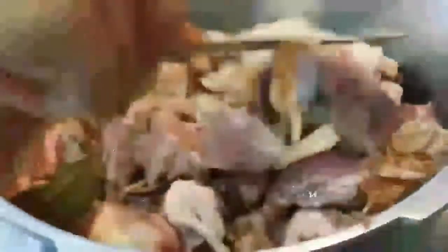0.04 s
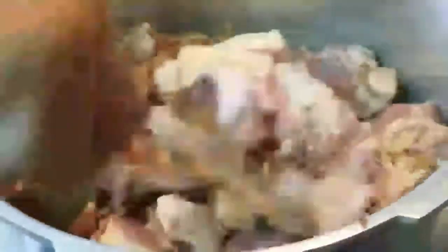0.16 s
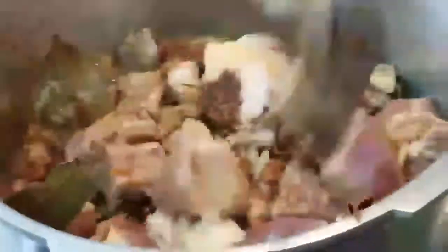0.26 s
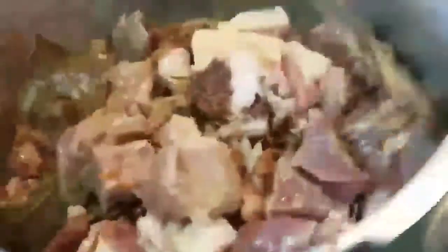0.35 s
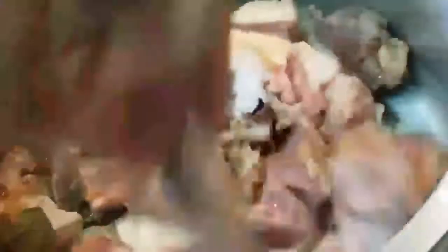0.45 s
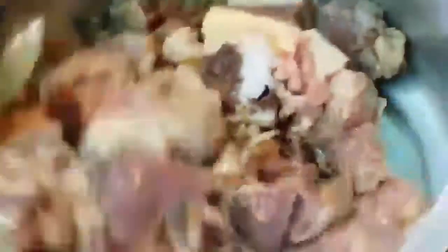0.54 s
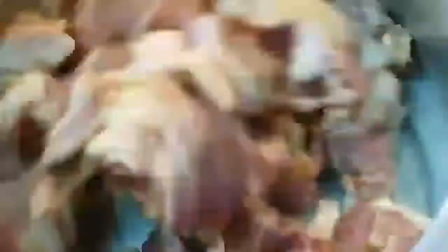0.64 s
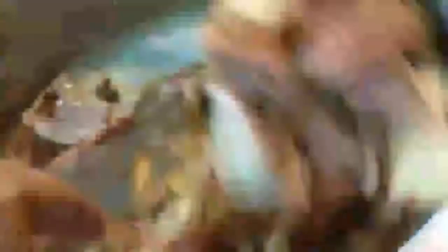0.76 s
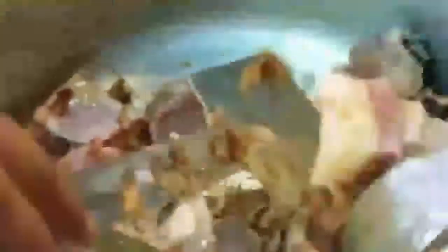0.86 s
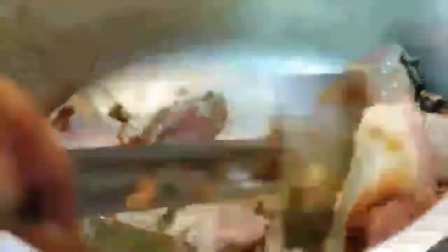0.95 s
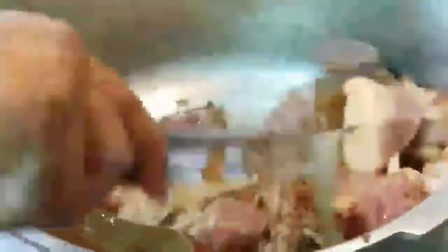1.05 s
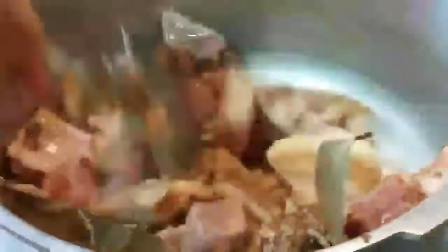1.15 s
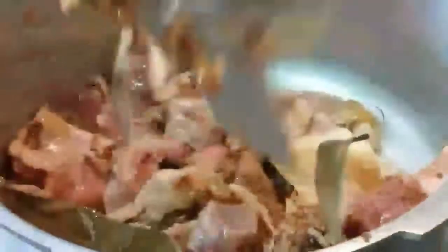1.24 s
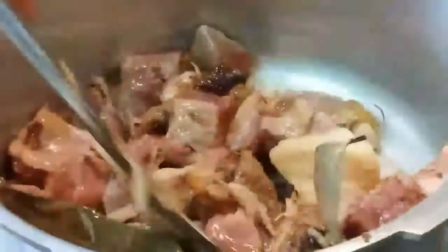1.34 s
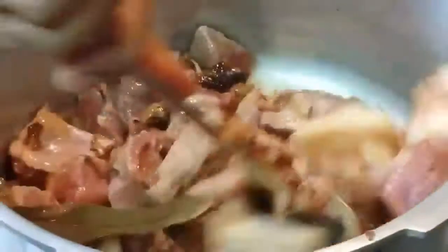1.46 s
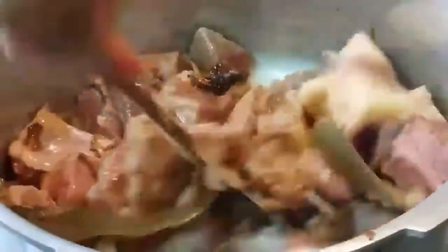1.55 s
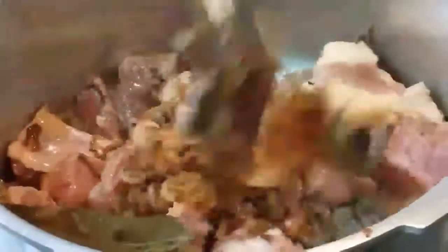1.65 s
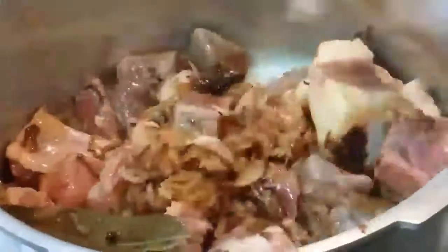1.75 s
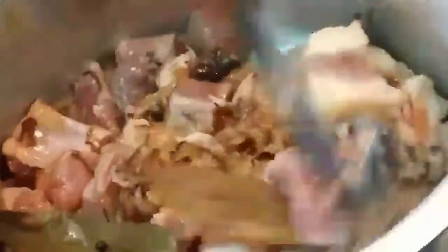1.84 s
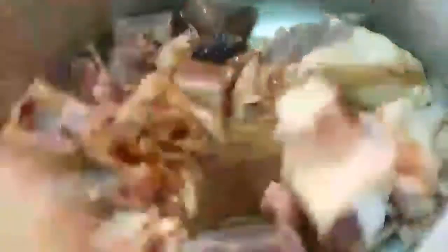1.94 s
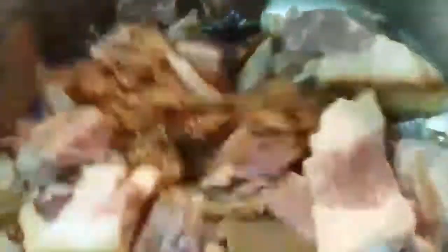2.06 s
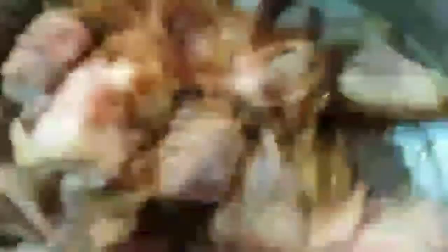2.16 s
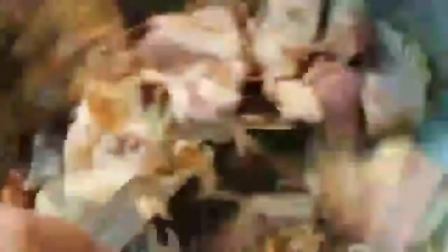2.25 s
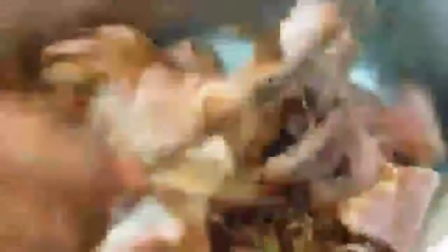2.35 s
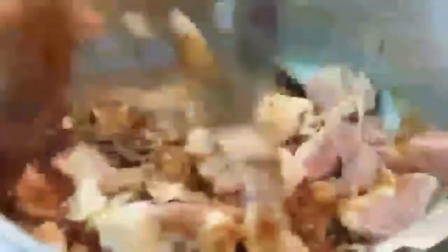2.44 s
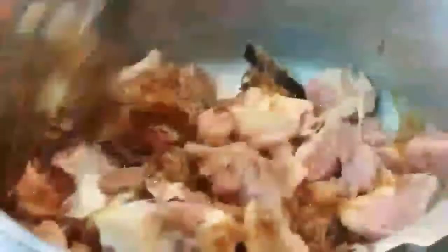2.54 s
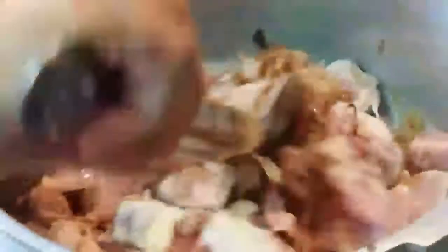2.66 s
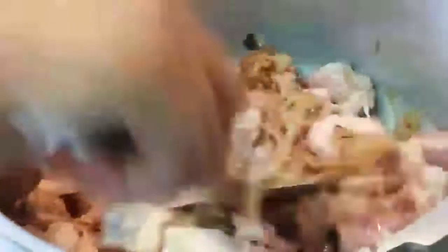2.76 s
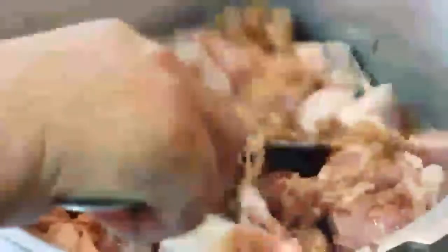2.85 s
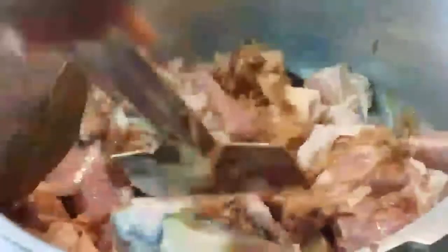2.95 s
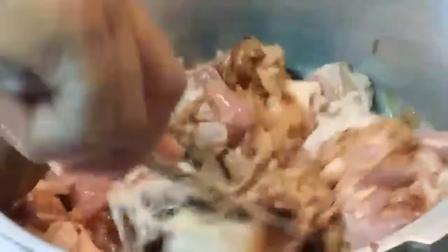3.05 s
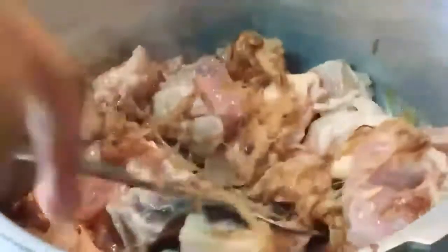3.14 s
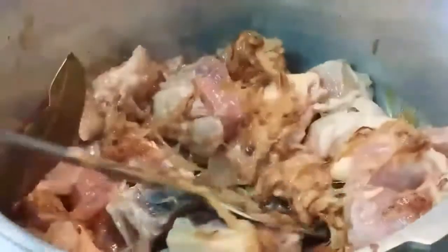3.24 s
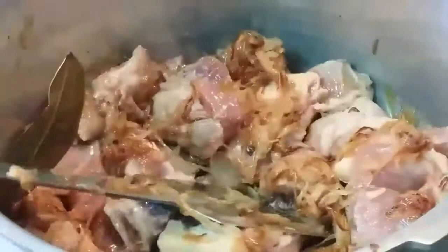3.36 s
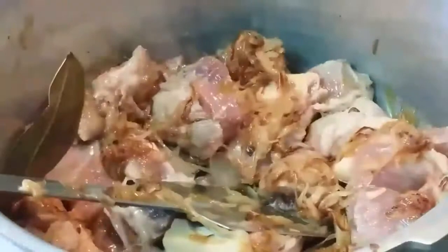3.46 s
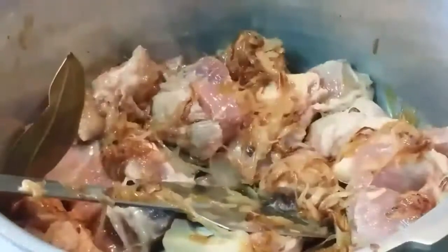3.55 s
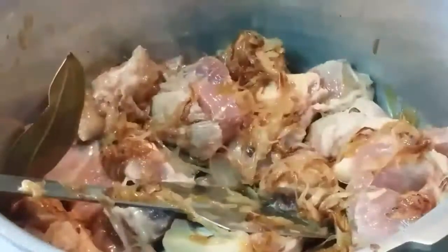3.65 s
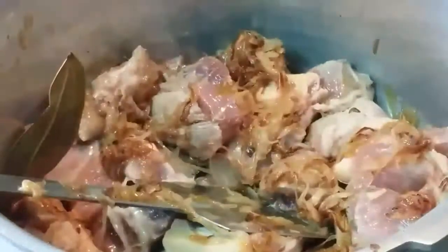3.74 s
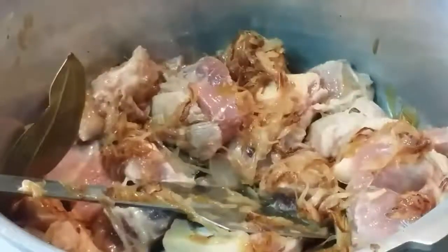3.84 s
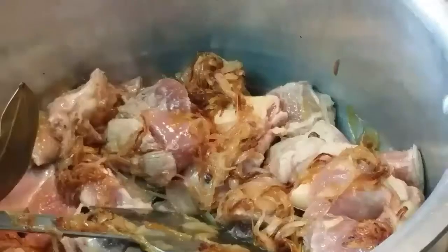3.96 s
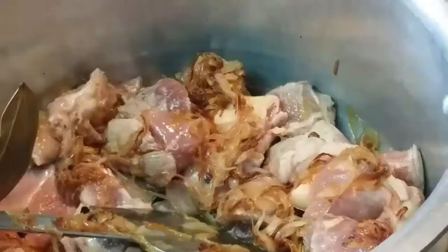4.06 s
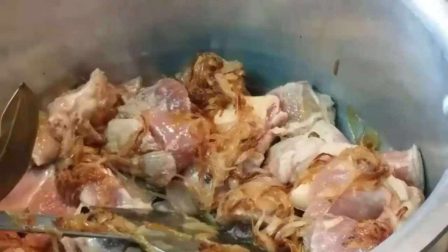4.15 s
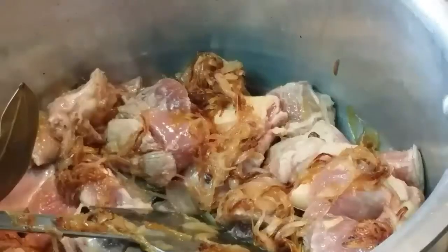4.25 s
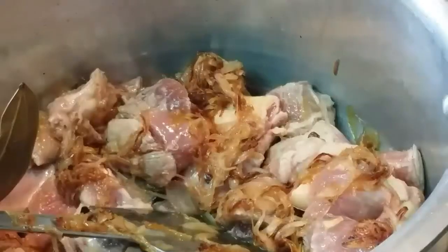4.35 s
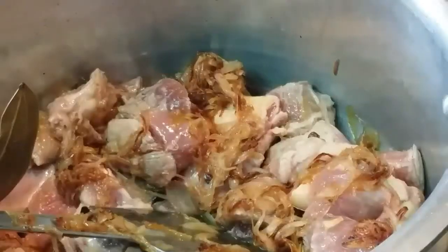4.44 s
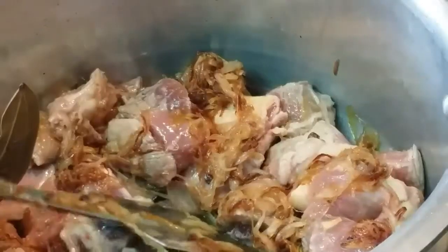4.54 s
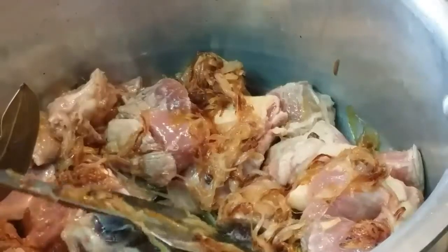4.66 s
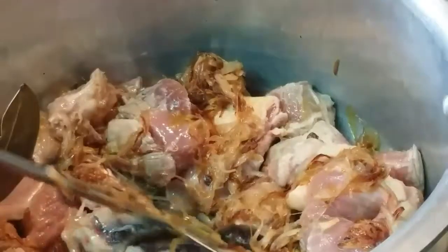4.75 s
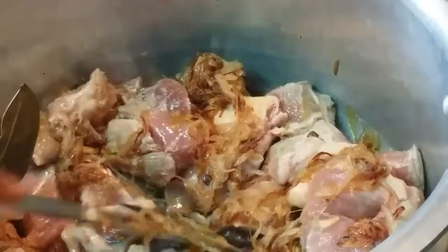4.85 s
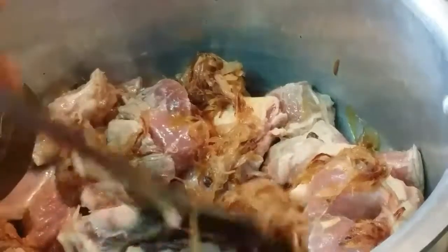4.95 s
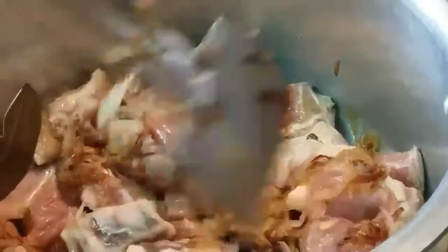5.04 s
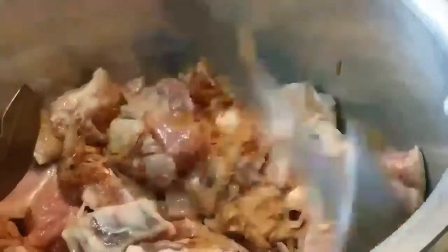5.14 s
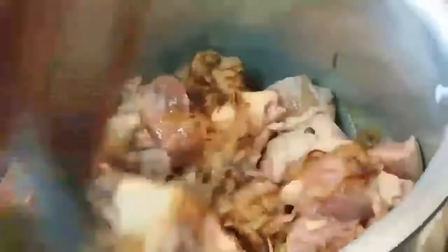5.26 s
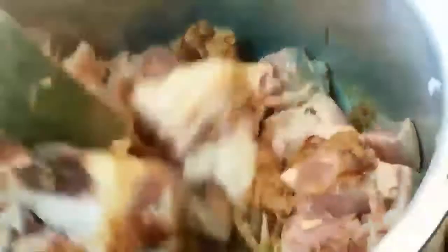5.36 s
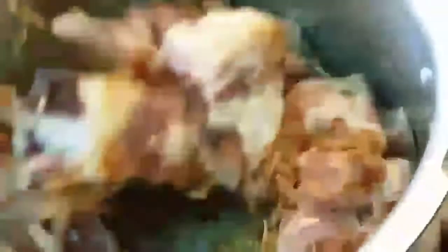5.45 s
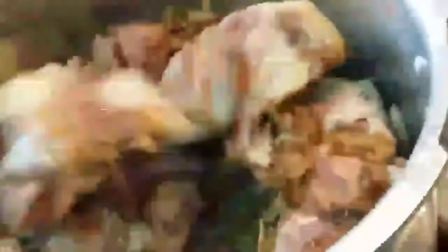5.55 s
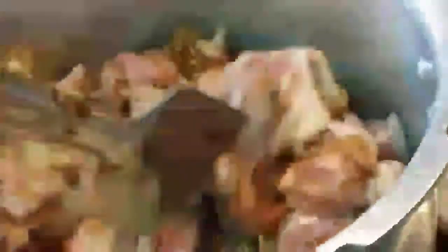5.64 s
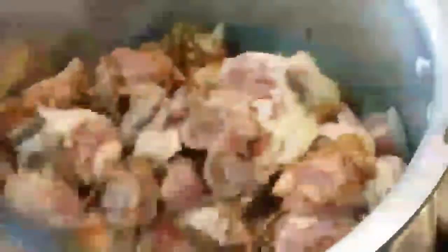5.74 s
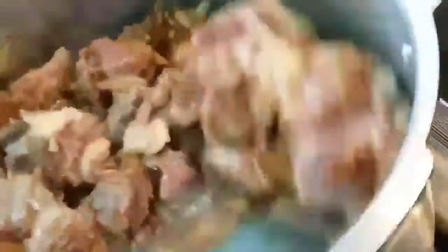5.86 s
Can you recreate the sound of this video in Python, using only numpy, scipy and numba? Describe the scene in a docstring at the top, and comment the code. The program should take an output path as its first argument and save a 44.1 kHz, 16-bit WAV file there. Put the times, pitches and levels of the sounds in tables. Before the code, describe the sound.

Hot oil hisses and pops as a steel spatula clanks and rasps in a pressure cooker, pauses over quiet frying, then resumes stirring.

```python
"""Meat sizzles in hot oil as a metal spatula knocks on the open pressure cooker, close by in a small kitchen.
The spatula skids down the wall and drags over the bottom, pauses, then stirs again; a low rumble lies under it.
The sizzle is filtered random clicks, easing as cooler pieces are turned onto the metal.
Knocks excite decaying modes of pot and blade; skids are a rasp that rings the blade.
Drags are stick-slip clicks passed through the pot's modes and a moving resonance."""
import sys
import numpy as np
from scipy import signal
from scipy.fft import rfft
from scipy.io import wavfile
from scipy.ndimage import uniform_filter1d, map_coordinates
from numba import njit

SR = 44100
rng = np.random.default_rng(int(sys.argv[2]) if len(sys.argv) > 2 else 0)


def wav_record(signal):
    """Record a signal, one row per channel, as 16-bit PCM in the file named by sys.argv[1]."""
    frames = np.transpose(np.atleast_2d(signal))
    bounded = np.clip(frames, -1, 1)
    # unit amplitude maps onto the largest positive 16-bit level
    quanta = np.round(bounded * 32767).astype(np.int16)
    wavfile.write(sys.argv[1], SR, quanta)


N = 260190
T = np.arange(N) / SR  # s
RING = T[:SR // 3]  # time axis of one ring, s

# Slow trend of the frying, easing as cool meat is turned down, recovering at rest:
# (t/s, level/dB before flares and trim)
FRYING_TREND = [(0.0, -36), (0.64, -36), (0.9, -39), (1.56, -40.5), (1.69, -43), (1.89, -47), (2.19, -48.5),
                (2.35, -55.5), (2.87, -54.5), (3.43, -57), (4.03, -58), (4.75, -50), (5.29, -52),
                (5.44, -45.5), (5.72, -50.5), (5.9, -54.5)]
# Flares when a wet piece settles on the metal: (t/s, length/s, boost/dB)
FRYING_FLARES = [(0.474, 0.13, 2.5), (0.745, 0.14, 2), (1.5, 0.15, 1), (1.998, 0.096, 1.5),
                 (2.67, 0.082, 7), (2.866, 0.19, 7.5), (3.106, 0.11, 5.5), (3.657, 0.3, 4.5),
                 (4.04, 0.65, 3.5), (4.58, 0.1, 3), (4.982, 0.059, 3.5)]
# Relative spectra of the fizz, bubbling, room rumble and spatula edge: (f/Hz, level/dB)
FIZZ_SPECTRUM = [(290, -29), (500, -7.5), (750, -12.5), (950, -3.5), (1220, -9), (1450, 1.5), (1700, -3.5),
                 (2600, 0.5), (3700, -1), (6700, -3), (8700, -1.5), (10500, -5.5), (15000, -9.5),
                 (16000, -27)]
BUBBLE_SPECTRUM = [(200, 3), (450, -8), (950, 6), (1450, 5.5), (2100, 7), (4000, -47), (9000, -32),
                   (16000, -31)]
RUMBLE_SPECTRUM = [(20, -15), (45, -12), (80, -4), (135, 1.5), (200, -2.5), (320, -8.5), (600, -9),
                   (1200, -15.5), (4000, -28.5)]
EDGE_SPECTRUM = [(300, -14), (1500, -15), (2000, -0.5), (2600, 0.5), (4500, 1), (8500, 2.5), (11000, -3.5),
                 (15500, -10)]
# Relative spectrum of the dragged pot bottom: (f/Hz, level/dB)
BOTTOM_SPECTRUM = [(100, -6.0), (380, -1.5), (600, 3.5), (1450, 1.0), (2200, -2.5), (8000, -11)]
# Modes of the pot, damped by its load: (f/Hz, relative level/dB, t60/s), before each contact's scaling
POT_MODES = [(262, -0.5, 0.098), (316.6, -7, 0.079), (415, 8.5, 0.031), (556.7, -3, 0.13), (635.5, -2, 0.1),
             (733, -2.5, 0.047), (851, -6, 0.15), (922, -1.5, 0.11), (1166, -3, 0.11), (1270, 3.5, 0.017),
             (1427, 3, 0.055), (1580, -2, 0.055), (1683, -1, 0.11), (2312, 3, 0.053)]
# Modes of the spatula blade: (f/Hz, relative level/dB, t60/s), before each contact's scaling
BLADE_MODES = [(2620, -9, 0.05), (2770, -5, 0.05), (3235, -9, 0.047), (3820, -4.5, 0.05),
               (4080, -2.5, 0.05), (4450, -2.5, 0.049), (4855, -1, 0.034), (5960, -2.5, 0.038),
               (6400, -1, 0.035), (7700, -13, 0.03), (8600, -1.5, 0.038), (9420, 3.5, 0.04),
               (10540, -5, 0.03), (12050, 3, 0.035)]
# Spatula knocks: (t/s, clack f/Hz, clack level/dB, leading pot mode f/Hz, pot ring level/dB,
# tick f/Hz, tick level/dB, blade ring level/dB, ring length factor [-], rebound share [0-1])
KNOCK_EVENTS = [(0.05, 1745, -19, 957, -15, 2000, -52, -50, 0.39, 0.7),
                (0.059, 395, -25, 320.6, -33, 3000, -50, -55, 1.4, 0.3),
                (0.071, 290, -28, 200, -34, 3000, -56, -60, 0.6, 0.3),
                (.101, 920, -22.5, 903, -23, 3000, -46, -55, .5, 0.33),
                (.697, 1050, -28, 952, -35, 3000, -46, -55, 0.72, 0.04),
                (.793, 1370, -21.5, 514, -17, 8600, -32, -53, 0.65, 0.6),
                (.801, 700, -25, 763, -23, 3000, -50, -55, 1.5, 0),
                (.939, 956, -18, 954, -32, 7900, -42, -53, 1.1, 0),
                (.9412, 820, -26, 570, -37, 3000, -50, -55, 1.2, 0.2),
                (2.036, 1540, -29.5, 567, -38, 3900, -42, -53, 1.2, 0.2),
                (2.042, 1490, -42, 268, -41, 11000, -37, -45, 0.57, 0),
                (2.2833, 1340, -12, 555, -16.5, 3900, -30.5, -36, 0.8, 0.27),
                (2.293, 1650, -20.5, 923, -30, 7500, -40, -44, 0.9, 0.1),
                (2.5356, 1490, -18, 1100, -25.5, 7500, -26, -30.5, 0.61, 0.04),
                (2.559, 1500, -41, 333, -35, 4500, -54, -56, 0.89, .4),
                (2.5855, 1500, -32, 1404, -27, 2850, -42, -20, 0.5, 0),
                (2.591, 1640, -28, 1635, -33, 9000, -41, -43, 0.35, 0),
                (2.715, 1090, -43, 1022, -37, 4500, -51, -58, 0.98, 0.4),
                (2.928, 1260, -30.5, 860, -34, 3870, -38, -43, 0.75, 0),
                (3.458, 1430, -31, 848, -28.5, 11000, -37, -35, 0.83, 0.2),
                (3.472, 1880, -36, 255, -40.5, 7000, -47, -50, 1.7, 0.1),
                (3.48, 1380, -40, 830, -43, 5000, -51, -42, 0.5, 0),
                (4.612, 1300, -48, 840, -41.5, 8530, -52, -62, 1.5, 0.1),
                (5.182, 705, -37, 269, -36, 3020, -62, -65, 0.42, 0),
                (5.269, 640, -28.5, 767, -27.5, 4500, -52, -54, 1.2, 0.35),
                (5.285, 1280, -43, 605, -35, 5200, -41, -39, 0.85, .3),
                (5.362, 715, -26, 630, -23, 3000, -50, -55, 0.85, .25),
                (5.392, 1740, -40, 717, -32, 10100, -26, -42, 0.69, 0),
                (5.590, 1130, -21, 519, -20, 7700, -27, -44, 0.69, 0.25),
                (5.5915, 2300, -29.5, 1150, -40, 2800, -50, -40, 0.36, 0),
                (5.895, 1030, -17, 960, -28, 7700, -21.5, -42, 1, 0)]
# The edge skids over oily metal: (t/s, rise/s, t60/s, level/dB, leading blade mode f/Hz,
# blade ring level against the rasp/dB)
SKID_EVENTS = [(0.46, 0.00074, 0.12, -26.5, 8640, -4), (.586, 0.0042, 0.31, -29, 3880, -6),
               (0.759, 0.024, 0.35, -33, 8900, -5), (1.183, 0.021, 0.21, -32, 3800, -8),
               (1.884, 0.001, 0.14, -23.5, 4870, -2), (1.903, 0.004, 0.4, -31.5, 7720, -5),
               (2.041, 0.002, 0.05, -37.5, 3950, 4), (2.928, 0.002, 0.12, -48, 3800, -3),
               (3.456, 0.0023, 0.09, -35, 9420, 2), (5.249, 0.0011, 0.14, -27, 5900, 2.5),
               (5.279, 0.012, 0.059, -32, 4450, -4), (5.31, 0.063, 0.093, -34.5, 4450, -8),
               (5.385, 0.0055, 0.27, -33.5, 4450, -10), (5.446, 0.006, 0.2, -40.5, 5950, -6)]
# Drags over the bottom, one path for each stroke: (t/s, level/dB, scrape resonance f/Hz)
DRAG_PATHS = [
    [(.205, -54, 1000), (.23, -40, 1120), (.26, -54, 1250)],
    [(.515, -54, 900), (.54, -32, 700), (.558, -29, 854), (.585, -35, 620), (.612, -30.5, 760),
     (.635, -42, 480), (.65, -54, 450)],
    [(.635, -50, 1150), (.68, -40.5, 1400), (.71, -53, 1550)],
    [(.76, -54, 1300), (.787, -41, 650), (.81, -38, 620), (.85, -52, 550)],
    [(.98, -54, 1163), (1.06, -47.5, 1353), (1.13, -53, 1530)],
    [(1.14, -51, 1102), (1.215, -45, 1356), (1.265, -53, 1500)],
    [(1.918, -48, 1030), (1.938, -30, 987), (1.972, -27.5, 844), (1.99, -38, 715), (2.008, -40, 680),
     (2.03, -53, 650)],
    [(2.07, -54, 878), (2.135, -45, 1003), (2.172, -40, 1040), (2.203, -50.5, 1144), (2.25, -42, 1410),
     (2.28, -51, 1600)],
    [(2.93, -54, 1503), (2.95, -45, 1890), (2.975, -61, 1810), (3.003, -50, 1500), (3.02, -60, 1500)],
    [(4.06, -66, 750), (4.095, -54, 680), (4.12, -66, 600)],
    [(5.25, -49, 800), (5.3, -42.5, 650), (5.312, -41, 802), (5.328, -32.5, 897), (5.35, -33.5, 900),
     (5.37, -26, 753), (5.385, -41, 690), (5.405, -41.5, 750), (5.45, -42, 900), (5.495, -42, 1153),
     (5.545, -49.5, 1295), (5.58, -42, 1543), (5.62, -46.5, 1304), (5.7, -56, 1400)],
    [(5.396, -52, 1597), (5.408, -37, 1736), (5.44, -45.5, 2110), (5.485, -49, 2330)],
]

FLARE_RISE_S, SIZZLE_TRIM_DB = 0.057, 0.55
RUMBLE_DB = -54.5
DIP_S, DIP_WIDTH_S, DIP_DB = 2.14, 0.23, -8  # the rumble sinks for a moment
BLADE_SPLIT = 0.022  # scale of the detuning in a cluster of blade modes, as a share of the pitch
SKID_RING_SHARE = 0.53  # share of the blade's decay times left while it skids
DRAG_RING_SHARE = 0.56  # share of the pot's decay times left under a drag
BEND_POWER = 0.204  # power of the scrape's relative pitch that the pot's modes follow
EVEN_DRAG_DB, PRESS_RANGE_DB = -35.5, 6  # level between light and hard; dB from there to nearly full press
WIDEN_OCT = 0.52  # a hard drag digs in and widens its resonance; a light one narrows it
DRAG_EVEN_S = 0.0253  # the hand holds the force of a drag even over this time
TICK_T60_S, TICK_RISE_S = 0.033, 0.0016
REBOUND_S, REBOUND_PITCH = 0.00837, 0.59  # the blade falls back softer, so lower
TOP_HZ = 15550


def undb(db):
    """Level definition: decibels to amplitude gain."""
    return 10 ** (np.asarray(db) / 20)


def unit(x):
    """Normalisation of power: scale to rms 1."""
    return x / np.sqrt(np.mean(x ** 2))


def fade(t, t60):
    """Exponential damping: 60 dB down after t60."""
    return np.exp(-np.log(1000) * t / t60)


def add(track, s, sound):
    """Superposition: mix a sound into the track at time s."""
    i = max(int(s * SR), 0)
    track[i:i + len(sound)] += sound[:max(N - i, 0)]


def colour(x, points):
    """Spectral shaping: filter by a (f/Hz, level/dB) curve, then scale to rms 1."""
    hz, db = np.transpose(points)
    f = np.maximum(np.fft.rfftfreq(len(x), 1 / SR), 1)
    gain = undb(np.interp(np.log(f), np.log(hz), db))
    return unit(np.fft.irfft(rfft(x) * gain, len(x)))


def walk(rate):
    """Random modulation: standard normal values, rate a second, joined by straight lines."""
    knots = rng.standard_normal(4096)
    return np.interp(T * rate, np.arange(len(knots)), knots)


def pops(rate, spread_db):
    """Shot noise: random clicks, rate a second, with sizes scattered in dB; rms 1."""
    hit = rng.random(N) < rate / SR
    size = undb(spread_db * np.clip(rng.standard_normal(N), -2, 2))
    return unit(hit * size * np.sign(rng.standard_normal(N)))


def ring(modes, weights=1):
    """Modal superposition: decaying sines, neighbours swinging in opposite senses."""
    hz, db, t60 = np.transpose(modes)
    gains = weights * undb(db) * (-1) ** np.arange(len(hz))
    swings = np.sin(2 * np.pi * hz[:, None] * RING)
    return gains @ (swings * fade(RING, t60[:, None]))


def resonate(x, response):
    """Linear response: convolve a sound with an impulse response of unit energy."""
    return signal.fftconvolve(x, response / np.sqrt(np.sum(response ** 2)))[:N]


@njit
def band(x, hz, q):
    """Driven resonance: state-variable band-pass with a moving centre and sharpness."""
    y, b, l = np.empty(len(x)), 0., 0.
    for i in range(len(x)):
        g = np.tan(np.pi * hz[i] / SR)
        v = (b + g * (x[i] - l)) / (1 + g * (g + 1 / q[i]))
        b, l, y[i] = 2 * v - b, l + 2 * g * v, v / q[i]
    return y


def rumble():
    """Broadband room noise: shaped Gaussian noise wanders in level and sinks once."""
    dip_db = DIP_DB * np.exp(-((T - DIP_S) / DIP_WIDTH_S) ** 2)
    noise = colour(rng.standard_normal(N), RUMBLE_SPECTRUM)
    return noise * undb(RUMBLE_DB + dip_db + 0.88 * walk(5.22))


def reverberate(x, t60=0.2, wet_db=-15):
    """Reverberation: near walls return dense echoes that decay exponentially after a 4 ms gap."""
    echoes = rng.standard_normal(len(RING)) * fade(RING, t60) * (RING > .004)
    return x + undb(wet_db) * resonate(x, echoes)


def frying_db():
    """Boiling rate as a level: a slow trend plus flares that rise quickly and ebb away."""
    level_db = np.interp(T, *np.transpose(FRYING_TREND))
    for s, length, boost_db in FRYING_FLARES:
        level_db = level_db + np.interp(T - s, [0, FLARE_RISE_S, length], [0, boost_db, 0])
    return level_db


def sizzle(bubble_db=-30.5, bubble_follow=0.58, calm_dulling=0.043):
    """Steam-burst noise: tiny bursts fizz in the oil; bigger bubbles sound in the pot and die down less."""
    fizz_db = frying_db()
    surge = walk(40)  # steam escapes in uneven spurts
    # lone spits stand out as the frying calms
    spits = pops(rate=90, spread_db=2.5) * undb(-14.5 - 0.06 * fizz_db)
    fizz = colour(pops(rate=28000, spread_db=2) + spits, FIZZ_SPECTRUM)
    # above 10 kHz the fizz fades more than the rest as the frying calms
    high_pass = signal.butter(2, 10000, "high", fs=SR, output="sos")
    fizz_top = signal.sosfiltfilt(high_pass, fizz)
    dulling = undb(calm_dulling * (fizz_db - fizz_db.max()))
    fizz = fizz + fizz_top * (dulling - 1)
    bursts = pops(rate=1800, spread_db=9.5)
    in_pot = undb(-20.5) * resonate(bursts, ring(POT_MODES))
    bubbles = colour(bursts + in_pot, BUBBLE_SPECTRUM)
    fizz_level = undb(fizz_db + SIZZLE_TRIM_DB + 0.85 * surge + 1.55 * walk(120))
    bubble_level = undb(bubble_db + bubble_follow * fizz_db + 2.3 * surge)
    return fizz * fizz_level + bubbles * bubble_level


def edge_grit():
    """Contact noise: the steel edge chatters on the wall in random clicks."""
    return colour(pops(rate=11000, spread_db=5), EDGE_SPECTRUM)


def blade_ring(length, weights):
    """Mode splitting: the bent, food-laden blade rings in close clusters that vary with each contact."""
    hz, db, t60 = np.transpose(BLADE_MODES)
    detunes = 1 + BLADE_SPLIT * rng.uniform(-1.1, 1, size=(3, len(hz)))
    rings = []
    for k, detune in enumerate(detunes):
        modes = np.c_[hz * detune, db, t60 * length]
        rings.append((-1) ** k * ring(modes, weights))
    return sum(rings) / np.sqrt(len(rings))


def skids(judder_db=3, lead_boost=2.5, waver=0.014):
    """Friction excitation: a juddering rasp dies as the edge slows; blade modes waver as contact shifts."""
    out = np.zeros(N)
    rasp = undb(judder_db * walk(200)) * edge_grit()
    blade_hz = np.transpose(BLADE_MODES)[0]
    shifting = np.cumsum(1 + waver * walk(60))  # wavering reading position, samples
    for s, rise, t60, db, lead_hz, blade_db in SKID_EVENTS:
        swell = np.clip((T - s) / rise, 0, 1) * fade(np.maximum(T - s - rise, 0), t60)
        octaves = np.log2(blade_hz / lead_hz)
        weights = 1 + lead_boost * np.exp(-(octaves / 0.099) ** 2)
        steady_blade = resonate(rasp, blade_ring(SKID_RING_SHARE, weights))
        blade = np.interp(shifting, np.arange(N), steady_blade)
        add(out, 0, undb(db) * swell * unit(rasp + undb(blade_db) * unit(blade)))
    return out


def scrapes(q=1.97, pot_db=-6, judder_db=2.5):
    """Stick-slip: jolts shake the pot; a resonance sinks as the blade digs in, climbs as it lifts."""
    out = np.zeros(N)
    slips = pops(rate=1500, spread_db=4.5) * undb(judder_db * walk(130))
    pressed_pot = ring(np.array(POT_MODES) * [1, 1, DRAG_RING_SHARE])
    shaken = slips + undb(pot_db) * resonate(slips, pressed_pot)
    body = colour(shaken, BOTTOM_SPECTRUM)
    for path in DRAG_PATHS:
        times, levels, centres = np.transpose(path)
        t = np.arange(times[0], times[-1], 1 / SR)
        db, hz = np.interp(t, times, levels), np.interp(t, times, centres)
        press = np.tanh((db - EVEN_DRAG_DB) / PRESS_RANGE_DB)
        # reading the body faster or slower bends its modes
        position = times[0] * SR + np.cumsum((hz / hz[0]) ** BEND_POWER)
        bent = map_coordinates(body, [position], order=1)
        rub = band(bent, hz, q * 2 ** (-WIDEN_OCT * press))
        force = np.sqrt(uniform_filter1d(rub ** 2, int(DRAG_EVEN_S * SR)))
        add(out, times[0], undb(db) * rub / force)
    return out


def clack(hz, t60=0.016):
    """Heavy damping: three short-lived partials give the dead sound of steel on the loaded pot."""
    swing = 2 * np.pi * hz * RING
    partials = np.sin(swing) - 0.29 * np.sin(1.32 * swing) - 0.36 * np.sin(0.694 * swing)
    return partials * fade(RING, t60)


def knocks(tick_q=5, spill=0.11):
    """Impact excitation: clack, tick and rings, perhaps a rebound; meat on the spot detunes and damps."""
    out, grit = np.zeros(N), edge_grit()
    mode_hz, blade_hz = np.transpose(POT_MODES)[0], np.transpose(BLADE_MODES)[0]
    for (s, clack_hz, clack_db, lead_hz, ring_db,
         tick_hz, tick_db, blade_db, length, rebound) in KNOCK_EVENTS:
        octaves = np.log2(mode_hz / lead_hz)
        # tune the nearest mode to the leading pitch
        detune = 2 ** -octaves[np.argmin(np.abs(octaves))]
        # modes near the leading one take most of the blow
        weights = spill + np.exp(-(octaves / 0.093) ** 2)
        pot = ring(np.array(POT_MODES) * [detune, 1, length], weights)
        pot = pot * (1 - fade(RING, 0.0048))
        # each knock has its own tick pitch, stressed within the chatter
        chatter = grit[rng.integers(N - len(RING)):][:len(RING)]
        centre, sharpness = np.full(len(RING), float(tick_hz)), np.full(len(RING), float(tick_q))
        chatter = unit(chatter + 1.1 * band(chatter, centre, sharpness))
        # blade modes above the tick are hardly set ringing
        blade = blade_ring(length, 1 / (1 + (blade_hz / tick_hz) ** 10))
        tick = undb(tick_db) * chatter * fade(RING, TICK_T60_S) + undb(blade_db) * blade
        tick = tick * (1 - fade(RING, TICK_RISE_S))
        add(out, s, undb(clack_db) * clack(clack_hz) + undb(ring_db) * pot + tick)
        fall_back = rebound * undb(clack_db) * clack(REBOUND_PITCH * clack_hz)
        add(out, s + REBOUND_S, fall_back)
    return out


def scene():
    """Superposition: frying and spatula reverberate in the kitchen above its rumble."""
    sources = sizzle() + skids() + scrapes() + knocks()
    return (reverberate(sources) + rumble())[None]


def record(dry):
    """Band limiting: a steep elliptic low-pass removes the extreme top."""
    low_pass = signal.ellip(10, .2, 80, TOP_HZ, fs=SR, output="sos")
    return signal.sosfilt(low_pass, dry)


dry = scene()
out = record(dry)
wav_record(out)
```